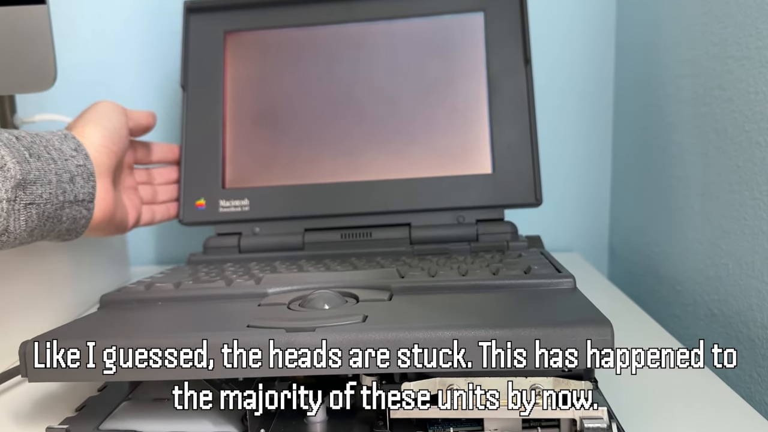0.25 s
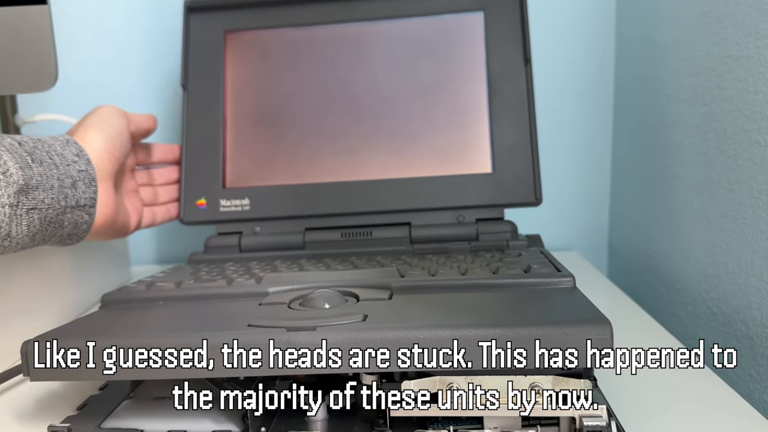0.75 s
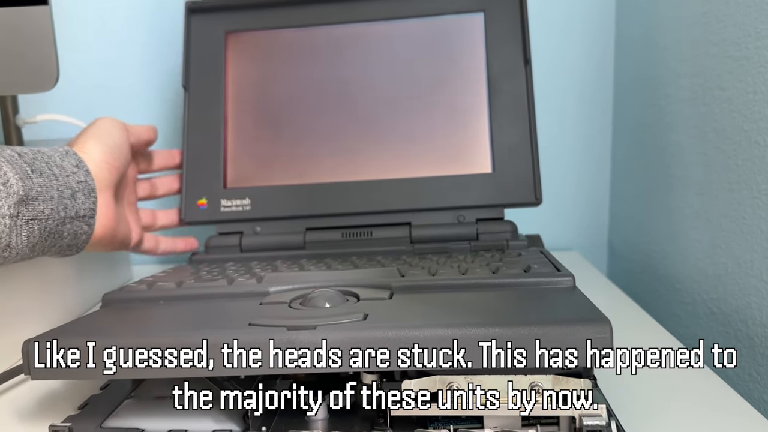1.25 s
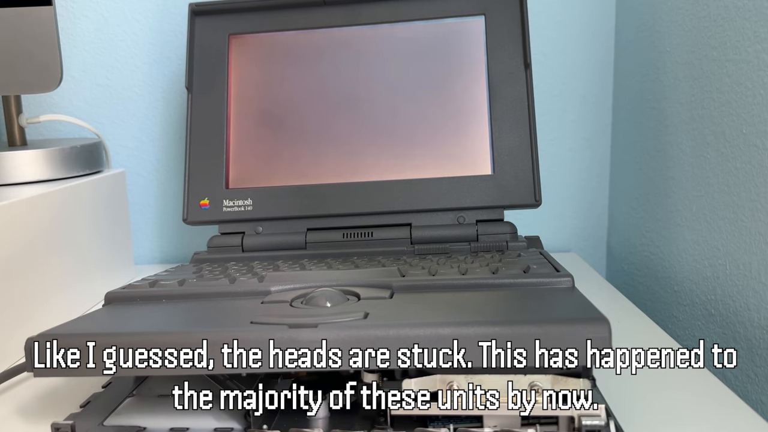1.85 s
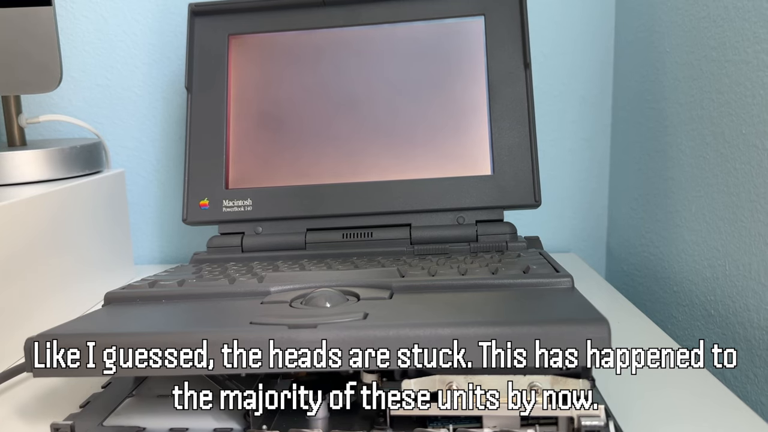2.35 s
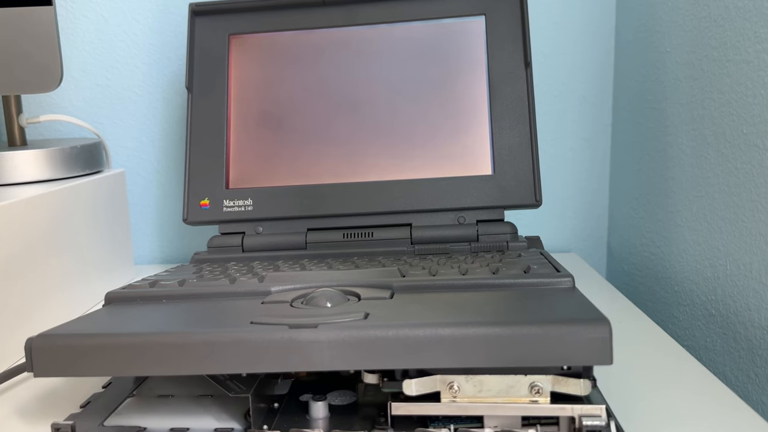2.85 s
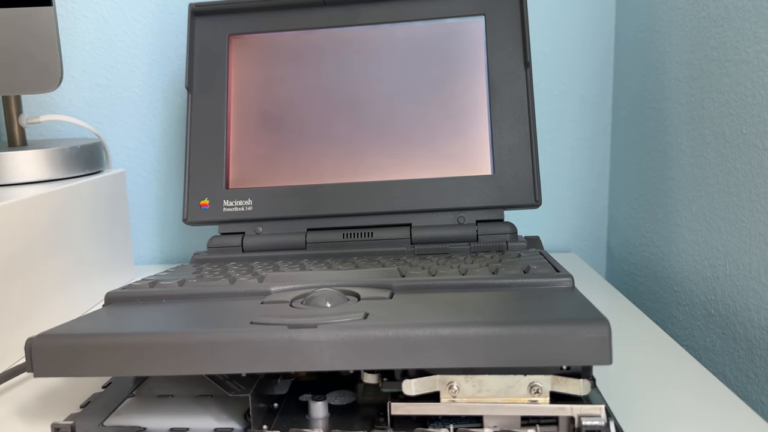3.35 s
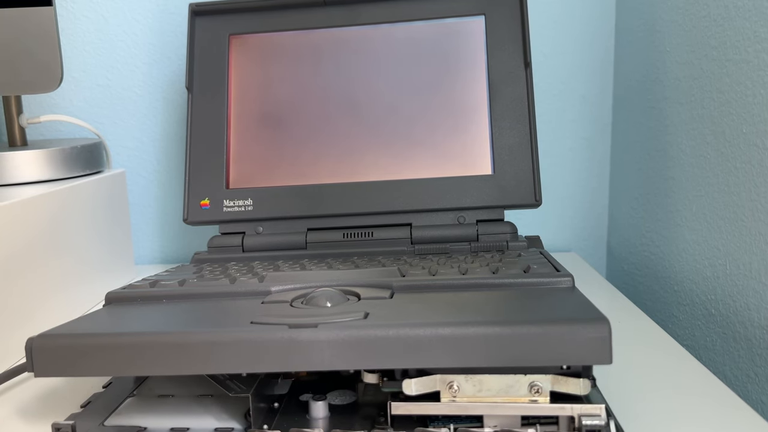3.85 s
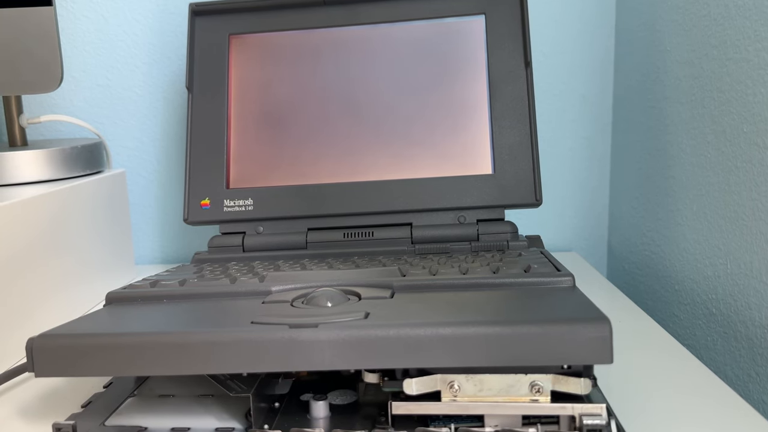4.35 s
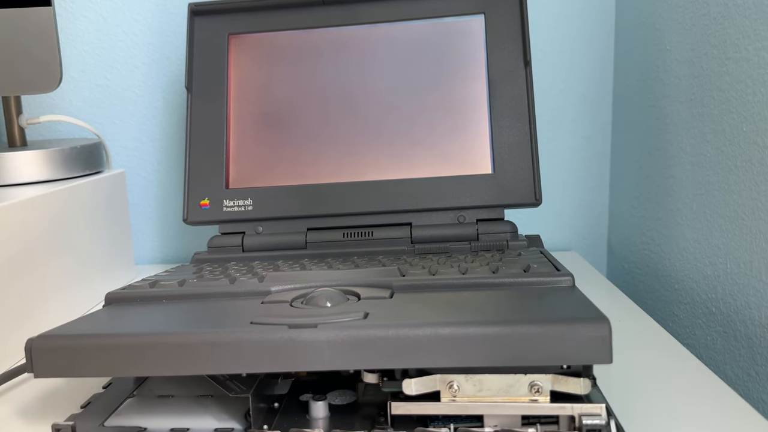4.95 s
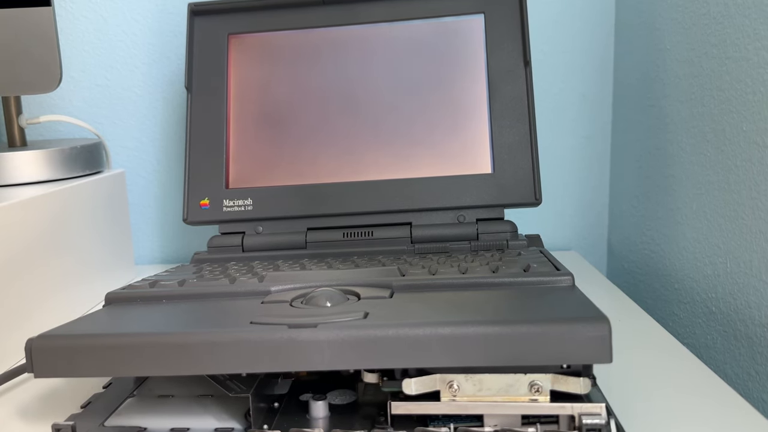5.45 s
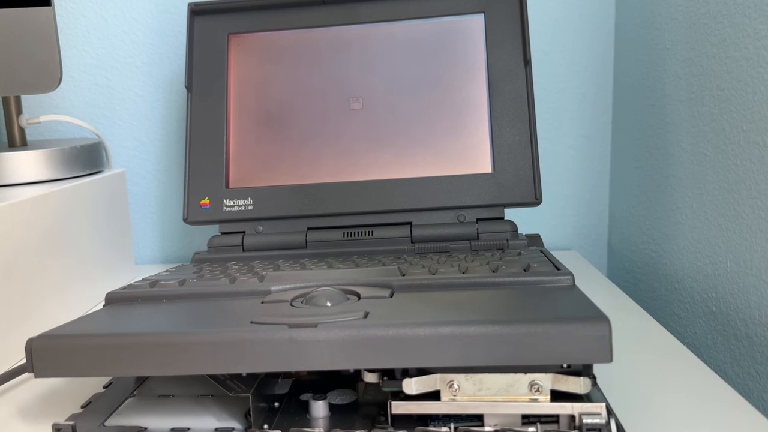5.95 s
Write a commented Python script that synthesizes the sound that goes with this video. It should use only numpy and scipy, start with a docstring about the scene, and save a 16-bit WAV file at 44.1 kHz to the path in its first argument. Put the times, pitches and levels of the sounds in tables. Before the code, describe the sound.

Close up, a jammed small motor pulses regularly, falls quiet, then buzzes raggedly on and on, a hard click snapping midway above faint whine and hum.

```python
"""Old laptop with a stuck hard drive

Close by on a desk in a small room, picked up by two microphone ports.
The drive motor buzzes in even pulses, rests, then strains in ragged bursts: jolts ring the drive housing.
A steady electronic whine of sines and a thin noise sizzle run beneath, with low hum and room air.
A hand bumps the case a few times (filtered contacts), and one sharp click rings the chassis."""
import sys
import numpy as np
from scipy import signal
from scipy.fft import rfft, irfft, next_fast_len
from scipy.io import wavfile
from scipy.ndimage import uniform_filter1d, map_coordinates

SR = 44100
rng = np.random.default_rng(int(sys.argv[2]) if len(sys.argv) > 2 else 0)


def wav_out(sig):
    """Save sig, one row per channel (or a flat mono array), as 16-bit PCM at SR to the path in sys.argv[1]."""
    wavfile.write(sys.argv[1], SR, np.round(np.clip(np.atleast_2d(sig).T, -1, 1) * 32767).astype(np.int16))


N = 273420  # length in samples

# how the laptop reaches the two microphone ports: hz, left_minus_right_db, left_lead_rad
LAPTOP_PAN = [(400, 1, -0.2), (745, -5, 2.52), (1096, -2.5, 2), (1164, -2.5, 0.3), (1280, -1, 0.5),
              (1400, -5.5, 0.4), (1520, 2.5, 1.5), (1620, -4.5, 1.6), (1820, -0.5, -1.2), (2030, 0, 2.5),
              (2200, 4, -1), (2560, 1.5, 1.24), (2770, -7.5, 0.8), (3340, -0.5, 1.6), (3700, -2, 1.6),
              (4200, -6, 0.72), (4550, 3.5, 0.5), (5120, 6.5, 1.8), (5550, 0, -1), (5720, -3.5, -0.8),
              (6240, 9, 3), (7200, 3.5, 1.2), (8750, -0.5, -0.81), (12200, 8, 11), (11960, -0.5, 2.5),
              (13200, 0.5, 1.23), (13600, -2, -1)]
EARS = np.array([[.5], [-.5]])  # a left-right difference is shared equally between the ports


def amp(db):
    """Decibels to gain."""
    return 10 ** (np.asarray(db) / 20)


def unit(x):
    """x at rms 1."""
    return x / np.sqrt(np.mean(x ** 2) + 1e-20)


def along(points, hz):
    """(Hz, value) points read on a log frequency axis."""
    f, v = np.transpose(points)
    return np.interp(np.log(hz + 1), np.log(f + 1), v)


def curves(rows):
    """One value per sample for each column after the time in seconds."""
    s, *columns = np.transpose(rows)
    return [np.interp(np.arange(N) / SR, s, column) for column in columns]


def wobble(rate):
    """A smooth random curve with rate knots a second."""
    knots = rng.standard_normal(int(N * rate / SR) + 4)
    return map_coordinates(knots, [np.arange(N) * rate / SR])


def add(track, s, sound):
    """Lay a sound into a track at s seconds."""
    start = int(np.clip(round(s * SR), 0, N))
    track[start:start + len(sound)] += sound[:N - start]


def filtered(x, response):
    """x times a response of frequency."""
    m = next_fast_len(N + SR // 2)
    return irfft(rfft(x, m) * response(np.fft.rfftfreq(m, 1 / SR)), m)[..., :N]


def ring(x, gain, size=16384):
    """x through a causal, minimum-phase body of unit energy whose gain by frequency has the given shape."""
    cepstrum = irfft(np.log(gain(np.fft.rfftfreq(size, 1 / SR)) + 1e-6))
    cepstrum[1:size // 2] *= 2  # folding the cepstrum forward makes the body causal
    cepstrum[size // 2 + 1:] = 0
    response = irfft(np.exp(rfft(cepstrum)))
    return signal.fftconvolve(x, response / np.linalg.norm(response))[:N]


def place(x, pan, wet_db):
    """A source at two ports differing in level and phase, with a separate decaying room answer in each."""
    # decay of the small room: hz, t60_s
    room_decay = [(100, 0.37), (500, 0.22), (2500, 0.22), (6000, 0.1), (14000, 0.034)]
    hz, t, z = signal.stft(rng.standard_normal((2, SR // 2)), SR, nperseg=256)
    decay = amp(-60 * t / along(room_decay, hz)[:, None])
    tail = signal.istft(z * decay, SR, nperseg=256)[1]
    delayed = np.pad(x, (SR // 150, 0))[None]  # the room answers about 7 ms later
    wet = signal.fftconvolve(delayed, tail / np.linalg.norm(tail[0]), axes=1)[:, :N]
    balance = [(f, db) for f, db, _ in pan]
    lead = [(f, angle) for f, _, angle in pan]

    def ports(f):
        pair = amp(EARS * along(balance, f)) * np.exp(1j * EARS * along(lead, f))
        # the sum of both ports keeps its level, within limits
        return pair / np.maximum(np.abs(pair.mean(axis=0)), .5)

    return filtered(x, ports) + amp(wet_db) * wet


def motor(lag_s=0.0013, inrush_db=0.5, inrush_s=0.004):
    """The motor strains against the stuck platter: even, alike pulses, then ragged bursts ring the housing."""
    # shift of the motor towards the left: time_s, left_minus_right_db
    drift = [(0, 3), (1.5, 3), (2.1, .8), (6.2, .8)]
    drive, current = np.zeros(N), np.zeros(N)
    for s, db, jolts in pulses() + bursts():
        size = np.full(len(jolts), amp(db))
        # the current overshoots each time it is switched on, then settles
        inrush = amp(inrush_db * np.exp(-np.arange(len(jolts)) / SR / inrush_s))
        add(drive, s, size * inrush * jolts)
        add(current, s + lag_s, size)  # the housing swings up a little late
    drift_db, = curves(drift)
    buzz = place(ring(steadied(drive, current), housing), LAPTOP_PAN, wet_db=-10.5)
    return buzz * amp(EARS * drift_db)


def pulses(period_s=.05645, scatter_db=0.5):
    """Trains of evenly spaced, alike current pulses, then lone ones, as (s, dB, jolts)."""
    # trains of motor pulses, even at first, then faltering: start_s, pulse_count, pulse_length_s, level_db
    trains = [(0.0206, 21, .010, -43.5), (1.172, 2, 0.0044, -38.5), (1.2853, 1, 0.0051, -42.5),
              (1.341, 1, 0.0036, -44), (1.398, 1, 0.0057, -39.5), (1.452, 1, .013, -43)]
    events = []
    for start, number, length, db in trains:
        for k in range(round(number)):
            level_db = db + scatter_db * rng.standard_normal()
            jolts = kicks(length, uneven=0.07, fast_hz=1738, slow_hz=1189.0, kick_s=.0036, jitter=0.14)
            events.append((start + k * period_s, level_db, jolts))
    return events


def bursts(lead_s=0.0012):
    """Every burst is a short chain of current kicks that sets in partway through the first, as (s, dB, jolts)."""
    # bursts of the straining motor: start_s, length_s, level_db
    strains = [(2.148, 0.0078, -37.5), (2.1575, 0.009, -33.5), (2.1725, 0.0089, -44), (2.179, 0.021, -41),
               (2.227, 0.011, -44), (2.254, 0.0254, -41), (2.2845, 0.0095, -41.0), (2.2983, 0.013, -54),
               (2.3143, 0.0165, -43.5), (2.3377, 0.019, -40.5), (2.3596, 0.0215, -46.5),
               (2.3925, 0.0215, -41), (2.414, 0.016, -42.5), (2.4406, 0.01, -36.5), (2.454, 0.0145, -46.5),
               (2.5006, 0.012, -40.5), (2.516, 0.0145, -41), (2.541, 0.0088, -44.5),
               (2.5526, 0.0264, -41.5), (2.622, 0.0095, -41.5), (2.655, 0.0279, -40.5),
               (2.6873, 0.013, -41.5), (2.7066, 0.012, -44), (2.719, 0.013, -42), (2.755, 0.0088, -41.5),
               (2.768, 0.014, -39.5), (2.7804, 0.021, -43.5), (2.8046, 0.02, -39), (2.823, 0.014, -42),
               (2.864, 0.018, -43.0), (2.902, 0.0229, -39.5), (2.9276, 0.0249, -38.5), (2.955, 0.01, -40.5),
               (2.972, 0.0125, -48.5), (3.024, 0.0205, -42.5), (3.0554, 0.021, -41.5),
               (3.082, 0.012, -40.5), (3.096, 0.01, -40), (3.1226, 0.036, -39.5), (3.174, 0.0089, -41),
               (3.201, 0.0165, -44), (3.2224, 0.0115, -39), (3.2357, 0.017, -41), (3.279, 0.008, -40.5),
               (3.285, 0.0387, -43), (3.3314, 0.01, -50), (3.3435, 0.0095, -41.5), (3.3777, 0.0205, -40),
               (3.4, 0.0099, -44), (3.424, 0.0135, -40.0), (3.4437, 0.017, -43.5), (3.531, 0.0095, -40),
               (3.549, 0.011, -42), (3.5804, 0.0083, -40.5), (3.5936, 0.0089, -39), (3.6136, 0.0424, -40.5),
               (3.66, 0.014, -40.5), (3.675, 0.0145, -42.0), (3.7028, 0.0195, -40), (3.725, 0.0076, -44),
               (3.732, 0.0186, -41.5), (3.756, 0.012, -45), (3.7704, 0.018, -42), (3.787, 0.0074, -45.5),
               (3.8186, 0.0185, -39.0), (3.846, 0.0105, -46), (3.8592, 0.012, -48), (3.8717, 0.0089, -40.5),
               (3.8971, 0.0086, -42), (3.9094, 0.0087, -41.5), (3.928, 0.021, -45.0),
               (3.9486, 0.009, -40.5), (3.965, 0.0085, -45), (3.9824, 0.011, -43), (3.9984, 0.0205, -40.5),
               (4.035, 0.0115, -45), (4.0453, 0.0105, -46.5), (4.0603, 0.014, -50.5),
               (4.081, 0.0274, -39.5), (4.1167, 0.0195, -40), (4.1396, 0.0145, -38.0),
               (4.1524, 0.0254, -41), (4.186, 0.017, -44), (4.212, 0.0125, -42), (4.231, 0.0062, -49),
               (4.2383, 0.0092, -42.5), (4.245, 0.038, -42.0), (4.288, 0.0091, -47.0),
               (4.303, 0.024, -41.5), (4.3285, 0.048, -41), (4.392, 0.009, -38.0), (4.4225, 0.0135, -43.0),
               (4.45, 0.036, -42), (4.499, 0.009, -43), (4.5132, 0.0105, -42.5), (4.528, 0.0165, -38.5),
               (4.545, 0.0125, -40.5), (4.5611, 0.0314, -40.5), (4.6403, 0.0085, -37.5),
               (4.6634, 0.019, -41.5), (4.7005, 0.0414, -39.5), (4.747, 0.0254, -43.5),
               (4.778, 0.0145, -43), (4.8114, 0.0079, -44), (4.8674, 0.0074, -39.5), (4.878, 0.008, -42.5),
               (4.8903, 0.0229, -40.0), (4.9318, 0.009, -36), (4.9533, 0.017, -42), (4.977, 0.01, -39),
               (4.99, 0.011, -39.5), (5, 0.0259, -38), (5.0345, 0.011, -39.5), (5.0475, 0.013, -37.5),
               (5.1, 0.0145, -42.5), (5.1344, 0.012, -43.0), (5.1592, 0.0135, -40), (5.1727, 0.01, -39),
               (5.1843, 0.0135, -42.5), (5.2016, 0.0085, -41.5), (5.221, 0.0115, -45),
               (5.2373, 0.01, -40.5), (5.25, 0.019, -39.0), (5.286, 0.0105, -43.0), (5.3147, 0.02, -42.5),
               (5.376, 0.0092, -39.5), (5.3866, 0.0239, -41.5), (5.4235, 0.021, -41.5),
               (5.4611, 0.0098, -43.5), (5.478, 0.0098, -49), (5.5196, 0.0145, -40.5), (5.559, 0.019, -41),
               (5.5795, 0.033, -41.5), (5.6227, 0.01, -51), (5.659, 0.024, -41), (5.683, 0.012, -43),
               (5.698, 0.017, -41), (5.723, 0.021, -41), (5.751, 0.016, -44), (5.7838, 0.0205, -40.5),
               (5.839, 0.0115, -41), (5.857, 0.021, -43.5), (5.8956, 0.0284, -42), (5.926, 0.011, -44),
               (5.941, 0.011, -42), (5.963, 0.0115, -45), (5.9876, 0.01, -43.5), (6.006, 0.0095, -41.5),
               (6.0203, 0.013, -47), (6.045, 0.022, -44), (6.0922, 0.017, -42.0), (6.1217, 0.0319, -42.5),
               (6.188, 0.01, -45.0)]
    events = []
    for s, length, db in strains:
        jolts = kicks(length, uneven=.16, fast_hz=1829.6, slow_hz=981.3, kick_s=.008, jitter=.055,
                      lead_s=lead_s)
        events.append((s, db, jolts))
    return events


def kicks(length, uneven, fast_hz, slow_hz, kick_s, jitter, lead_s=0):
    """A chain of current kicks of rms near 1, each setting off a chatter of jolts that slows down."""
    t = np.arange(int(abs(length) * SR) + 1) / SR
    kick_lengths = kick_s * np.exp(uneven * rng.standard_normal(size=24))
    starts = np.append(0, np.cumsum(kick_lengths))
    progress = np.interp(t + lead_s, starts, np.arange(len(starts))) % 1  # 0 to 1 within each kick
    rate = fast_hz + (slow_hz - fast_hz) * progress
    turns = np.cumsum(rate) / SR
    jolts = np.arange(int(turns[-1]) + 1)
    scattered = jolts + jitter * rng.standard_normal(size=256)[:len(jolts)]
    at = np.interp(scattered, turns, t)
    return np.bincount(np.round(at * SR).astype(int)) * np.sqrt(SR / rate.mean())


def steadied(x, envelope, window_s=0.0059, lag_s=0.0018, count=3):
    """Jolts scaled so that the housing's swing follows the size of the motor current."""
    def power(v):
        return np.abs(uniform_filter1d(v ** 2, int(window_s * SR))) + 1e-9

    gain = np.ones(N)
    for _ in range(count):
        swing = np.roll(ring(x * gain, housing), -int(lag_s * SR))
        gain = np.clip(gain * np.sqrt(power(envelope) / power(swing)), .4, 2)
    return x * gain


def housing(hz):
    """Relative gain of the drive housing: steep-sided resonances over a broad noise-like gain."""
    # ringing of the drive housing: centre_hz, half_width_hz, gain_db
    resonances = [(1081, 22, -7.5), (1149.1, 17.7, 1.5), (1295, 15.6, -10.5), (1322.4, 18.5, -2),
                  (1373.5, 18.4, 0.5), (1399.6, 13.5, 4.5), (1447.5, 20, -6), (1482, 10, -17.5),
                  (1759, 45.4, -11.5), (1843, 59, -17), (2660, 96, -26), (2855, 52, -18), (3076, 40, -22),
                  (3690, 31, -21), (4145, 81, -15), (4395, 80, -21), (4740, 84, -19), (5280, 60, -33)]
    # broad noise-like gain under the resonances: hz, gain_db
    broad_gain = [(600, -44), (860, -19.5), (1000, -41), (1600, -45), (2050, -32.5), (2400, -27),
                  (3350, -47), (3900, -29), (4600, -41.5), (5800, -34), (7400, -52), (8400, -40.5),
                  (10000, -78.5), (15500, -48)]
    power = sum((amp(db) / (1 + ((hz - centre) / width) ** 2)) ** 2 for centre, width, db in resonances)
    return np.sqrt(power + amp(along(broad_gain, hz)) ** 2)


def ticks(t60_s=0.0031, lowest_hz=2200):
    """Brief, decaying noise rings the treble of the housing: bright ticks from inside the drive."""
    # hard little ticks as the drive is jogged or its motor snags: time_s, level_db (before the housing)
    snags = [(0.141, -47), (.194, -46), (0.253, -39), (2.1512, -51), (2.161, -40.5), (2.1705, -45),
             (2.1745, -36), (2.179, -46), (4.908, -42)]
    track, t = np.zeros(N), np.arange(SR // 20) / SR
    for s, db in snags:
        add(track, s, amp(db - 60 * t / t60_s) * rng.standard_normal(len(t)))

    def treble(hz):
        return housing(hz) / (1 + (lowest_hz / (hz + 1)) ** 4)

    return place(ring(track, treble), LAPTOP_PAN, wet_db=-11)


def click(crack_t60_s=0.015, swell_s=0.0011, lowest_hz=335):
    """A hard snap and its rebound: a bright noise crack, then the chassis rings in decaying modes."""
    # contacts of the sharp click: time_s, crack_db, body_db
    contacts = [(3.4778, -35.5, -51), (3.4797, -15, -46), (3.4803, -25.5, -12), (3.4885, -25.5, -44),
                (3.4993, -36, -43), (3.511, -40, -51), (3.521, -39, -54)]
    # modes of the chassis: hz, gain_db, t60_s
    chassis = [(304, -25, 0.034), (444, -5.5, 0.068), (487, -12, 0.072), (565, -14, 0.033),
               (610, -13, .035), (673, -3, 0.023), (756, -21, 0.061), (1065, -22, .05), (1156, -20, 0.099),
               (1254, -24, 0.062), (1377, -17, .07), (2000, -19, 0.03), (2220, -25, 0.11),
               (3060, -20, 0.038), (4000, -17, .025), (4800, -22, 0.031)]
    # colour of the crack: hz, gain_db (relative)
    crack_colour = [(150, -21), (300, 1.5), (650, 11), (950, 3.5), (1350, 2), (1620, -1.5), (2000, 9),
                    (2600, 2), (3100, 4.5), (3800, 1), (4300, 1), (5600, -5), (6100, -16), (7700, -31),
                    (8400, -15), (12000, -64)]
    # how the click reaches the two microphone ports: hz, left_minus_right_db, left_lead_rad
    click_pan = [(195.5, 3, 0.35), (470, 0, -0.81), (724, -9, -0.15), (1400, -0.5, 1), (2000, 5, 1.2),
                 (2860, -9, 1), (4120, 3, 0.78), (6570, 8, 1.1), (8730, 4.5, 0.33)]
    cracks, body, t = np.zeros(N), np.zeros(N), np.arange(SR // 4) / SR
    for s, crack_db, body_db in contacts:
        add(cracks, s, amp(crack_db - 60 * t / crack_t60_s) * rng.standard_normal(len(t)))
        modes = sum(amp(db - 60 * t / t60) * np.sin(2 * np.pi * hz * t) for hz, db, t60 in chassis)
        add(body, s, amp(body_db) * modes * (1 - np.exp(-t / swell_s)))
    # a small panel radiates little bass
    body = signal.sosfilt(signal.butter(4, lowest_hz, "high", fs=SR, output="sos"), body)
    crack = ring(cracks, lambda hz: amp(along(crack_colour, hz)))
    return place(crack, click_pan, wet_db=-11.5) + place(body, click_pan, wet_db=-19.0)


def bumps(push_db=17, rub_db=-6, rub_t60_s=0.041, thud_t60_s=0.078, thud_hz=54):
    """Each soft contact is one push and a brief rub on the plastic case, and a thud into the desk."""
    # soft bumps on the case: time_s, knock_db (before 5 dB of lift), brightness_hz, thud_db
    contacts = [(.195, -43, 1010, -73), (0.253, -33.5, 1710, -35.5), (0.377, -40, 300, -46),
                (0.41, -45, 320, -62), (1.169, -49.5, 900, -68), (1.22, -52, 892, -74),
                (1.276, -46.5, 800, -53), (1.597, -46.5, 1520, -49), (1.604, -51, 457, -65),
                (4.751, -52, 990, -74), (5.97, -56, 707, -77)]
    # colour of the plastic case: hz, gain_db (relative)
    case_colour = [(80, -6.5), (200, -1), (350, -6.5), (500, 0), (780, 4), (1000, -2.5), (1300, 5),
                   (2000, -13), (6000, -0.5), (12000, -37)]
    knocks, thuds, t = np.zeros(N), np.zeros(N), np.arange(SR // 2) / SR
    for s, db, bright_hz, thud_db in contacts:
        push = amp(push_db) * (t == 0)
        rub = amp(rub_db - 60 * t / rub_t60_s) * rng.standard_normal(len(t))
        softening = signal.butter(3, bright_hz, fs=SR, output="sos")
        add(knocks, s, amp(db) * signal.sosfilt(softening, push + rub))
        thud = amp(thud_db - 60 * t / thud_t60_s) * np.sin(2 * np.pi * thud_hz * t)
        add(thuds, s + 0.0062, thud)  # the thud follows 6 ms later
    case = amp(5) * ring(knocks, lambda hz: amp(along(case_colour, hz)))
    return place(case, LAPTOP_PAN, wet_db=-12.0) + thuds


def whine(crowd_db=-58, count=900):
    """Steady tones of the electronics, slightly wavering in level, among a crowd of weak overtones."""
    # steady tones of the electronics: hz, peak_db (before placing)
    steady_tones = [(1046, -70), (1057, -68), (1081, -58.5), (1107, -62.5), (1259, -69), (1314, -64),
                    (1385, -64), (1954, -76), (2262, -79), (2417, -72), (2492, -70), (2515, -67.5),
                    (2552, -72), (2627, -73), (2793, -70), (2827, -74), (3171, -78), (3515, -80),
                    (4005, -70.5), (4043, -74), (4118, -74), (4151, -70), (4394, -66.5), (4415, -68),
                    (4532, -67.5), (4952, -70), (5021, -72), (5054, -70.5), (5227, -77), (5286, -75),
                    (5576, -72), (5749, -75), (5814, -73)]
    # colour of the faint crowd of overtones round them: hz, gain_db (relative)
    crowd_colour = [(700, -24), (1080, -15), (1650, -24), (2250, -5.5), (2550, 6.5), (2850, 7.5),
                    (3500, -9), (4080, 10), (4320, 3), (4750, 3.5), (5600, 0), (7200, -13.5), (8700, -7),
                    (11000, -29)]
    t = np.arange(N) / SR
    tones = sum(amp(db + 1.3 * wobble(6.6)) * np.sin(2 * np.pi * (hz * t + rng.random()))
                for hz, db in steady_tones)
    lines = np.zeros(N // 2 + 1, complex)
    lines[rng.integers(N // 60, N // 4, count)] = np.exp(2j * np.pi * rng.random(count))
    crowd = unit(filtered(irfft(lines, N), lambda hz: amp(along(crowd_colour, hz))))
    return place(tones + amp(crowd_db) * crowd, LAPTOP_PAN, wet_db=-11.5)


def sizzle():
    """Thin high sizzle of the electronics: a narrow treble band of noise, slowly shifting in level."""
    # colour of the sizzle: hz, gain_db (relative)
    sizzle_colour = [(11000, -69), (12000, -19.5), (12300, 9.5), (12700, 15.5), (13300, 5.5), (13800, 7.5),
                     (15500, -46.5)]
    # level of the sizzle: time_s, rms_db
    sizzle_level = [(0, -64), (1.2, -66.5), (1.7, -68.5), (6.2, -67.5)]
    level_db, = curves(sizzle_level)
    fizz = filtered(rng.standard_normal(N), lambda hz: amp(along(sizzle_colour, hz)))
    return amp(level_db) * unit(place(fizz, LAPTOP_PAN, wet_db=-8.5))


def hum(hum_hz=58.7):
    """A low sine hum that wavers in level and pitch, alike in both ports."""
    # one chance course of a wavering low hum: time_s, peak_db
    hum_course = [(0.0, -61), (0.17, -65), (0.28, -49), (0.38, -55.5), (1.1, -65.5), (1.91, -56.5),
                  (2.33, -66.5), (2.8, -57), (3.26, -67), (3.66, -52), (3.99, -76.5), (4.8, -63.5),
                  (4.94, -80), (6.2, -66.5)]
    course_db, = curves(hum_course)
    t = np.arange(N) / SR
    # finer random wavering rides on the course
    return amp(course_db + 1.4 * wobble(21)) * np.sin(2 * np.pi * hum_hz * t + 1.0 * wobble(21))


def room_air(hiss_db=-64):
    """Room air and fine hiss: wide stereo noise in which only the low murmur drifts in level."""
    # noise spectrum: hz, gain_db (relative)
    noise_spectrum = [(20, -8.5), (45, -12), (115, 3), (160, -7), (250, -3.5), (400, -12), (650, -14),
                      (950, 3.5), (1800, 0), (4500, -1), (7000, -3.5), (8800, -29), (9800, -72),
                      (15500, -11.5)]
    # level of the room's low murmur: time_s, rms_db (before 5 dB of lift)
    murmur_level = [(0.0, -70.5), (2.14, -72), (3.63, -70), (4.35, -77), (4.73, -75), (5.53, -74.5),
                    (6.2, -68.5)]
    murmur_db, = curves(murmur_level)
    air = rush(noise_spectrum, side_db=-6.5)
    low_air = filtered(air, lambda hz: 1 / (1 + (hz / 850) ** 4))
    return amp(murmur_db + 5) * unit(low_air) + amp(hiss_db) * unit(air - low_air)


def rush(spectrum, side_db):
    """Stereo noise of rms 1, a common middle with a weaker opposed side."""
    mid, side = filtered(rng.standard_normal((2, N)), lambda hz: amp(along(spectrum, hz)))
    return unit(mid + amp(side_db) * np.array([side, -side]))


def scene():
    """Motor, contacts and whine over the room's hum and air."""
    drive = motor() + ticks()
    contacts = click() + bumps()
    electronics = whine() + sizzle()
    return drive + contacts + electronics + hum() + room_air()


def record(dry, low_hz=36, top_hz=15780):
    """The recorder sheds the deepest bass and keeps nothing above its band limit."""
    thinned = signal.sosfilt(signal.butter(4, low_hz, "high", fs=SR, output="sos"), dry)
    return filtered(thinned, lambda hz: hz < top_hz)


dry = scene()
out = record(dry)
wav_out(out)
```